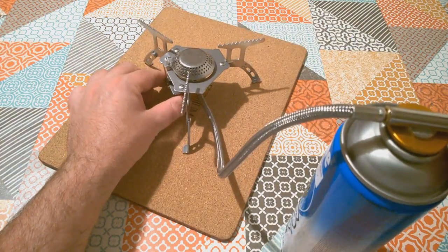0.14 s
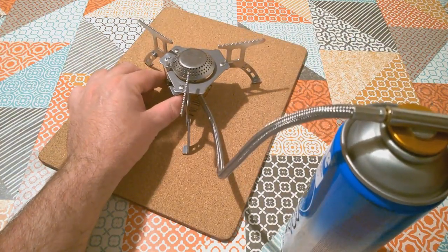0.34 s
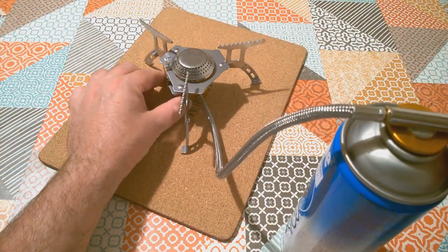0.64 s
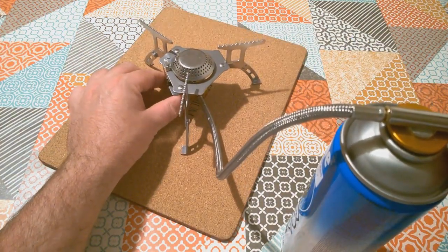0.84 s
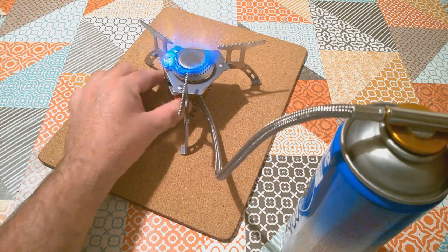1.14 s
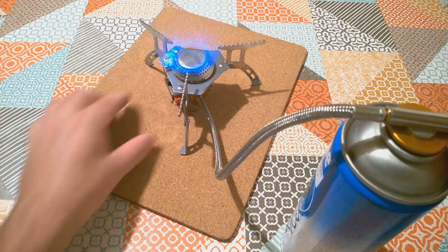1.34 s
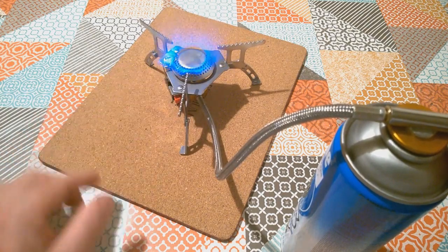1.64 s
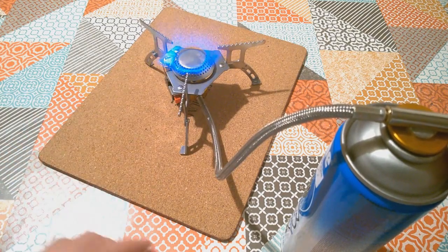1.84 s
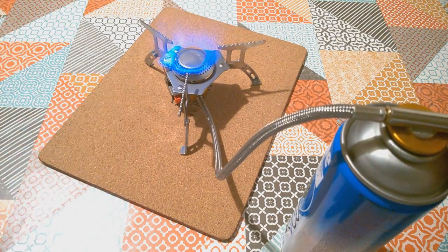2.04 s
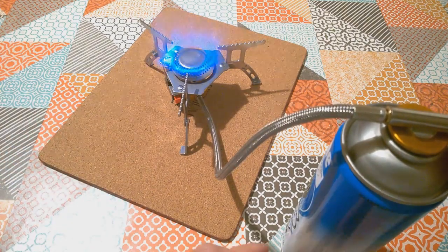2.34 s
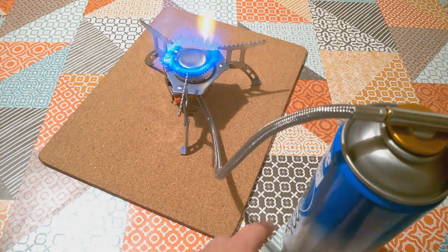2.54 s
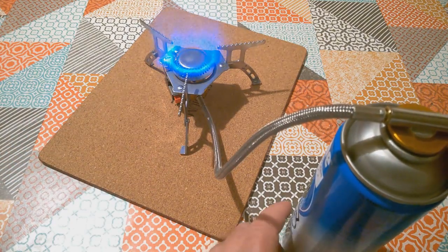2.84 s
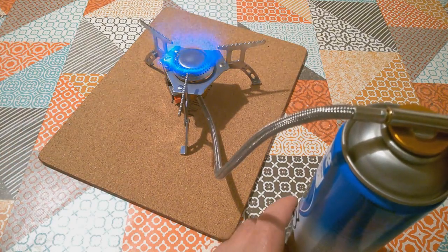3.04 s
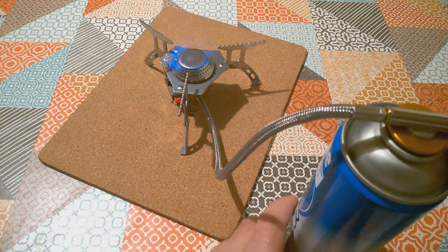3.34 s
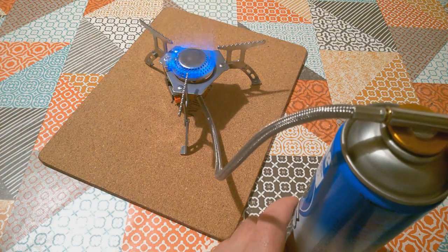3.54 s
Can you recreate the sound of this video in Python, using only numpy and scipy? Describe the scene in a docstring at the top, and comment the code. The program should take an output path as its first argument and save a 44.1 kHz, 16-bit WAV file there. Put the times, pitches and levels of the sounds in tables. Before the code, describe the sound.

Gas hisses from a camping stove, then two igniter snaps set the burner softly roaring.

```python
"""A camping gas stove hisses on a cork mat, close up and in mono. The valve opens and gas rushes through the
resonant mixing tube. The piezo igniter is worked twice: the button ticks as it is pressed and as it is
released, and the hammer snaps, each with a thud into the table. The second snap lights the burner, which roars
softly. The hand withdraws from the air inlet and the hiss changes colour; the flame grows, starves and starts
to flare again. Low room tone lies underneath, and a limiter ducks the hiss around each snap."""
import sys
import numpy as np
from scipy import signal
from scipy.fft import rfft, irfft, next_fast_len
from scipy.io import wavfile
from scipy.ndimage import uniform_filter1d, minimum_filter1d, map_coordinates

SR = 44100
rng = np.random.default_rng(int(sys.argv[2]) if len(sys.argv) > 2 else 0)


def store_wav(level_fs):
    """Save 16-bit WAV to argv[1]."""
    pcm = np.round(np.clip(np.atleast_2d(level_fs), -1, 1) * 32767)
    wavfile.write(sys.argv[1], SR, pcm.T.astype(np.int16))


N = 163170

# hiss envelope, following the gas flow through four stages: t/s, level/dB
HISS_INTRO = [(0.0, -31.5), (0.04, -45.5), (0.12, -68)]
HISS_UNLIT = [(0.16, -32), (0.172, -34), (0.204, -21), (0.262, -14.5), (0.388, -2), (0.632, -13),
              (0.728, -20.5), (0.876, -21), (0.966, -14), (1.06, -11.5)]
HISS_LIT = [(1.14, -12), (1.25, -10.5), (1.34, -15.5), (1.55, -15), (1.87, -12), (1.88, -13.5), (3.19, -12),
            (3.3, -14.5)]
HISS_STARVED = [(3.37, -16), (3.45, -24), (3.52, -32), (3.56, -45), (3.61, -72), (3.645, -63), (3.68, -47),
                (3.7, -41)]
# hiss colour with the hand at the air inlet, and with the inlet free: f/Hz, level/dB
COVERED_EQ = [(120, -82), (200, -52), (293, -38), (321, -17), (393, -23.5), (517, -25.5), (718, -16),
              (910, -20), (1110, -12.5), (1820, -13.5), (2350, -7.5), (2580, -11.5), (2770, -10),
              (3390, -12.5), (3780, -7), (5350, -4), (6080, -1.5), (7850, -6.5), (9250, 3), (10500, -5.5),
              (11900, -21), (13600, -7), (15700, -36)]
FREE_EQ = [(1470, -44), (2500, -14.5), (2810, -15), (3050, -18.5), (3250, -11), (3700, -3), (4030, -5.5),
           (4660, -8), (5230, 1), (5430, 2.5), (5960, -6), (6840, -2.5), (7450, -9.5), (8110, -7.5),
           (8750, 0), (9170, 1.5), (10700, -3), (11300, -13.5), (11500, -16), (11800, -16), (12400, -21),
           (13200, -4.5), (13700, -9.5), (14100, -13), (15700, -29)]
# narrow resonances of the tube and burner head: f/Hz, width/Hz, boost/dB
TUBE_PEAKS = [(2790, 39, 4.5), (3700, 58, 2), (3790, 49, 4), (4680, 34, 1.5), (5290, 70, 2), (5740, 70, 3),
              (6220, 92, 5), (8940, 70, 2), (9360, 30, 7), (10060, 77, 3)]
# colour of the burner's rush at full flame: f/Hz, level/dB
RUSH_EQ = [(300, -30), (900, -13), (1800, -8.5), (2900, -11.5), (3700, 1.5), (4900, -2.5), (5900, -12),
           (7000, -5.5), (9000, -15), (12000, -14), (15500, -21)]
# the rush surges with the flame, relative to the hiss: t/s, level/dB
RUSH_BLEND = [(1.9, -33), (2.3, -7.5), (2.45, -12), (2.53, -3), (2.62, -4.5), (2.72, -4), (3.2, -4.5),
              (3.5, -17.5)]
# roar envelope, burning and then starving and flaring: t/s, level/dB
ROAR_BURNING = [(1.1, -26), (1.12, -18), (1.21, -20.5), (1.38, -18.5), (1.5, -20.5), (2.59, -18.5),
                (2.8, -16.5), (3.3, -19.5)]
ROAR_STARVED = [(3.38, -24), (3.47, -29), (3.55, -35), (3.615, -48), (3.645, -37), (3.678, -37),
                (3.695, -27)]
# colour of the roar: f/Hz, level/dB
ROAR_EQ = [(15, -49), (25, -24), (48, -6.5), (86, -6.5), (125, -0.5), (146, 2), (184, -4.5), (262, 1),
           (295, -1), (325, 2.5), (388, -6.5), (420, -0.5), (454, -11), (491, -8.5), (521, -8), (621, -7.5),
           (672, -6), (771, -6.5), (919, -16.5), (1120, -10.5), (1210, -13), (1940, -10), (2260, -10.5),
           (2550, -17.5), (2700, -19), (3510, -34), (5940, -120)]
# the young flame's hum in the burner head: t/s, level/dB
HUM_ENVELOPE = [(1.1, -26), (1.26, -24.5), (1.38, -21), (1.5, -25.5), (1.62, -30.5), (1.82, -25),
                (2.1, -27), (2.4, -33), (3.0, -73)]
# igniter button ticking, first as it is pressed and then as it is released: t/s, tick level/dB, thud level/dB
BUTTON_CUES = [(0.1395, -10.5, -15), (0.8400, -7, -17.5)]
# igniter hammer striking: t/s, snap level/dB, thud level/dB
SNAP_CUES = [(0.6864, 14.5, -16), (1.0817, 14.5, -8)]
# colours of the thumb's touch, the spring's tick and the hammer's snap: f/Hz, level/dB
TOUCH_EQ = [(300, -20), (2000, -17), (3300, -2.5), (4300, -7), (5500, -1), (7500, -12.5), (11000, -11.5),
            (15500, -21)]
TICK_EQ = [(300, -16), (2000, -22), (3200, -18), (5500, -8), (8000, -10), (10000, 2), (11200, 1),
           (12500, -26), (15500, -9)]
SNAP_EQ = [(200, -11.5), (1200, -7), (2500, -5), (4000, 3), (7500, -5), (10500, -3.5), (13000, -10.5),
           (15500, -13.5)]
# modes of the stove on its mat and table: f/Hz, level/dB, t60/s
TABLE_MODES = [(103, -5, 0.096), (129, -5, 0.096), (246, -6.5, .04), (348, -9, .035)]
# colour of the room tone: f/Hz, level/dB
ROOM_EQ = [(25, -20.5), (60, -1), (100, -2.5), (135, 5), (190, -14.5), (350, -15), (600, -27.5),
           (2000, -38), (15000, -52)]

LIGHT_S, CATCH_S = 1.086, 0.0064  # when the gas lights, and how fast
HAND_LEAVES_S, HAND_FADE_S = 1.29, 0.018


def gas_jet():
    """Gas hisses through the mixing tube; the burner's rush blends in as the flame grows."""
    flow_db = curve(np.vstack([HISS_INTRO, HISS_UNLIT, HISS_LIT, HISS_STARVED]))
    # lighting shifts the colour part of the way to the free inlet's; the leaving hand does the rest
    free = np.maximum(0.4 * fade_in(LIGHT_S, CATCH_S), fade_in(HAND_LEAVES_S, HAND_FADE_S))
    covered_hiss = amp(-0.3) * np.sqrt(1 - free) * noise(COVERED_EQ, TUBE_PEAKS)
    free_hiss = amp(1) * np.sqrt(free) * noise(FREE_EQ, TUBE_PEAKS)
    hiss = hand_sweep(covered_hiss + free_hiss)
    rush_gain = amp(curve(RUSH_BLEND))
    jet = turbulence(hiss + rush_gain * noise(RUSH_EQ)) / np.sqrt(1 + rush_gain ** 2)
    treble_db = 0.34 * free * np.clip(flow_db + 10.5, -20, 0)  # a weak jet loses its top end
    jet = high_shelf(jet, treble_db, corner_hz=8100, steepness=8)
    flicker_db = 0.1 * wobble(rate_hz=34.87) + 0.52 * wobble(rate_hz=400)
    return amp(flow_db + flicker_db) * scatter(jet)


def hand_sweep(hiss, depth=0.4, width_s=0.06):
    """The hiss bounces off the leaving hand; the lengthening delay makes a brief flange."""
    since = clock() - HAND_LEAVES_S
    delay_ms = np.clip(0.18 + 0.55 * since, 0, 1)
    echo = map_coordinates(hiss, [np.arange(N) - delay_ms * SR / 1000])
    return hiss + depth * np.exp(-(since / width_s) ** 2) * echo


def turbulence(jet, depth_db=1.3):
    """Turbulence makes small patches of the jet's spectrum swell and sink at random."""
    spectrum = signal.stft(jet, nperseg=512)[2]
    patches = uniform_filter1d(rng.standard_normal(spectrum.shape), size=7, axis=0)
    patches = uniform_filter1d(patches, size=14, axis=1)
    return signal.istft(spectrum * amp(depth_db * unit(patches)), nperseg=512)[1][:N]


def scatter(jet, wet_db=-11, t60=0.09, predelay_s=0.002):
    """Mat, canister and table scatter the hiss into a short, dense echo."""
    t = np.arange(SR // 20) / SR
    tail = rng.standard_normal(len(t)) * decay(t, t60) * (t > predelay_s)
    wet = signal.fftconvolve(jet, tail / np.linalg.norm(tail))[:N]
    return (jet + amp(wet_db) * wet) / np.sqrt(1 + amp(wet_db) ** 2)


def flame(hum_hz=349.5, hum_half_width_hz=47, trim_db=-0.5):
    """Burning gas gives a fluttering roar; the young flame also hums in the burner head."""
    lit = np.clip((clock() - LIGHT_S) / CATCH_S, 0, 1)
    size_db = curve(np.vstack([ROAR_BURNING, ROAR_STARVED]))
    treble_db = 1.17 * np.minimum(size_db + 23.5, 0)  # a low flame only murmurs
    roar = high_shelf(noise(ROAR_EQ), treble_db, corner_hz=450, steepness=6)
    hum_band = lambda hz: 1 / (1 + ((hz - hum_hz) / hum_half_width_hz) ** 4)
    hum = unit(filtered(rng.standard_normal(N), hum_band))
    flutter_db = 0.4 * wobble(rate_hz=27.99)
    return lit * (amp(size_db + trim_db + flutter_db) * roar + amp(curve(HUM_ENVELOPE)) * hum)


def igniter(touch_lead_s=0.002):
    """The thumb lands and the button ticks, once as it is pressed and once as it is released; the hammer snaps."""
    out = np.zeros(N)
    for at, tick_db, thud_db in BUTTON_CUES:
        tick = contact(at, TICK_EQ, rise_s=0.00047, t60=0.0033, rattle_db=-13, rattle_t60=0.12)
        out += amp(tick_db) * tick + amp(thud_db) * thud(at + 0.004, rise_s=0.0049)
    for at, snap_db, thud_db in SNAP_CUES:
        snap = contact(at, SNAP_EQ, rise_s=0.0001, t60=0.005, rattle_db=-22, rattle_t60=0.1)
        out += amp(snap_db) * snap + amp(thud_db) * thud(at + 0.01, rise_s=0.005)
    for at, tick_db, _ in BUTTON_CUES:
        touch_at = at - touch_lead_s
        touch = contact(touch_at, TOUCH_EQ, rise_s=0.00016, t60=0.014, rattle_db=-26, rattle_t60=0.06)
        out += amp(tick_db - 13.5) * touch
    return out


def contact(at, eq, rise_s, t60, rattle_db, rattle_t60):
    """A hit on the stove: a sharp noise transient with a brief rattle for a tail."""
    since = clock() - at
    age = np.maximum(since, 0)
    attack = np.exp(np.minimum(since, 0) / rise_s)
    return attack * (decay(age, t60) + amp(rattle_db) * decay(age, rattle_t60)) * noise(eq)


def thud(at, rise_s):
    """A jolt passes through the stove's legs and rings the table's low modes."""
    age = np.maximum(clock() - at, 0)
    modes = sum(amp(db) * decay(age, t60) * np.sin(2 * np.pi * hz * age) for hz, db, t60 in TABLE_MODES)
    return -modes * (1 - np.exp(-age / rise_s))


def room_tone(level_db=-47):
    """A faint, steady bed of low rumble."""
    return amp(level_db) * noise(ROOM_EQ)


def amp(db):
    """Decibels to gain."""
    return 10 ** (np.asarray(db) / 20)


def unit(x):
    """Scale to rms 1."""
    return x / np.sqrt(np.mean(x ** 2) + 1e-20)


def clock():
    """Time of each sample in seconds."""
    return np.arange(N) / SR


def curve(rows):
    """An envelope of straight lines through (time, value) rows."""
    return np.interp(clock(), *np.transpose(rows))


def fade_in(at, width_s):
    """A smooth step from 0 to 1."""
    return 0.5 + 0.5 * np.tanh((clock() - at) / width_s)


def decay(age, t60):
    """A tail that falls 60 dB in t60 seconds."""
    return np.exp(-np.log(1000) * age / t60)


def wobble(rate_hz):
    """Smooth random modulation, rate_hz knots a second."""
    return map_coordinates(rng.standard_normal(int(N * rate_hz / SR) + 4), [clock() * rate_hz])


def filtered(x, response):
    """Zero-phase EQ; response gives the gain at each frequency."""
    size = next_fast_len(N + SR // 2)
    return irfft(rfft(x, size) * response(np.fft.rfftfreq(size, 1 / SR)), size)[:N]


def high_shelf(x, treble_db, corner_hz, steepness):
    """Ride the treble above the corner and keep the body."""
    body = filtered(x, lambda hz: 1 / (1 + (hz / corner_hz) ** steepness))
    return body + (x - body) * amp(treble_db)


def noise(eq, peaks=()):
    """Noise of rms 1 with a broad colour and optional narrow resonances."""
    eq_hz, eq_db = np.transpose(eq)

    def response(hz):
        colour_db = np.interp(np.log(hz + 1), np.log(eq_hz + 1), eq_db)
        boost_db = sum(db / (1 + (2 * (hz - centre) / width) ** 2) for centre, width, db in peaks)
        return amp(colour_db + boost_db)

    return unit(filtered(rng.standard_normal(N), response))


def scene():
    """Stove and room, the same in both ears."""
    mono = gas_jet() + flame() + igniter() + room_tone()
    return np.array([mono, mono])


def record(dry):
    """A look-ahead limiter ducks just before each peak and recovers; a brick-wall low-pass follows."""
    ceiling_db, lookahead_s, release_s, top_hz = -1, 0.0064, 0.019, 15780
    mono = dry[0]
    ahead = int(lookahead_s * SR)
    headroom_db = np.minimum(ceiling_db - 20 * np.log10(np.abs(mono) + 1e-9), -1e-6)
    duck_db = -minimum_filter1d(headroom_db, ahead, origin=-(ahead // 2))
    release = clock() / release_s
    duck_db = np.exp(np.maximum.accumulate(np.log(duck_db) + release) - release)  # exponential recovery
    limited = mono * amp(-uniform_filter1d(duck_db, size=40))
    out = filtered(limited, lambda hz: hz < top_hz)
    return np.array([out, out])


dry = scene()
out = record(dry)
store_wav(out)
```